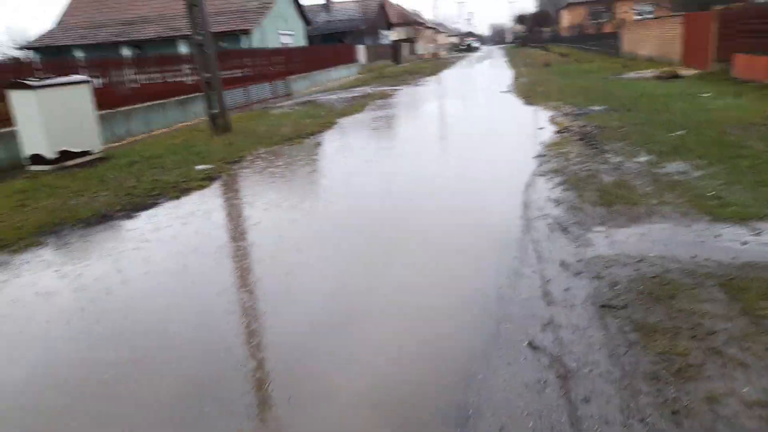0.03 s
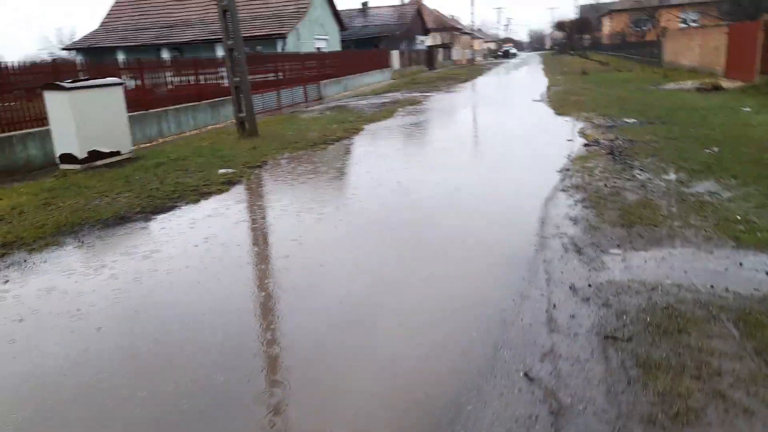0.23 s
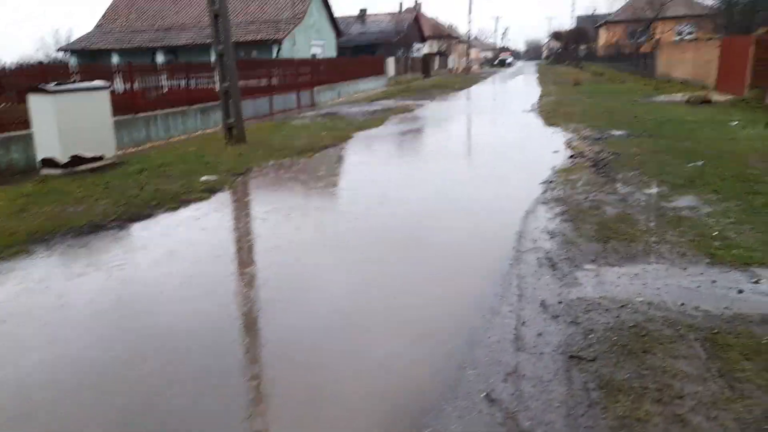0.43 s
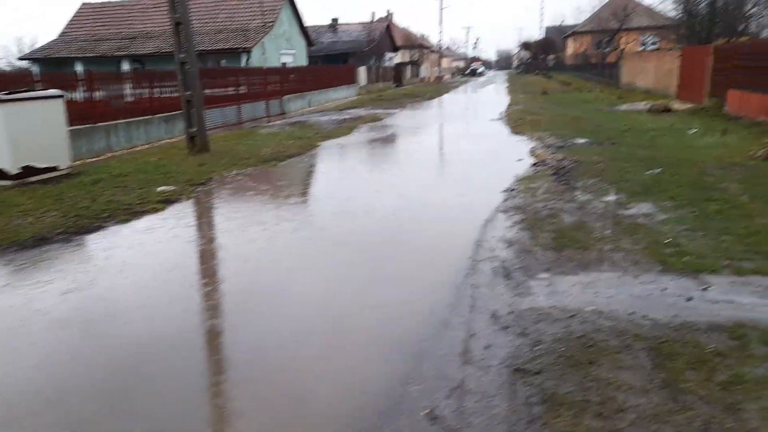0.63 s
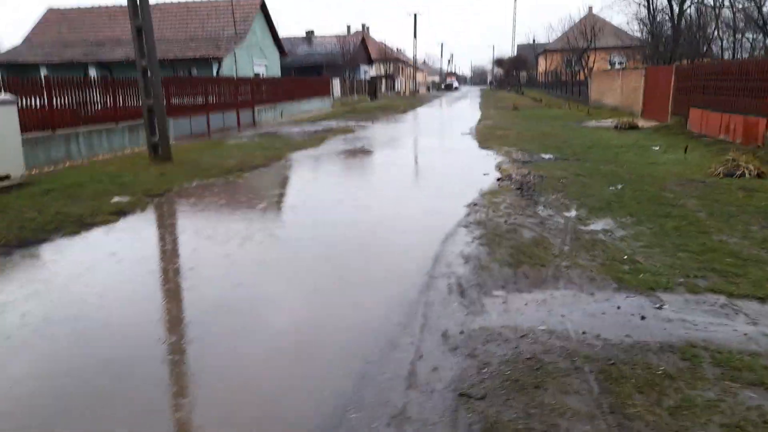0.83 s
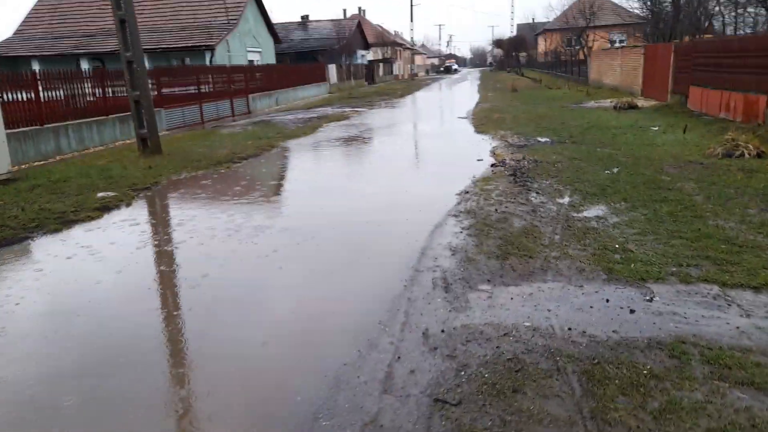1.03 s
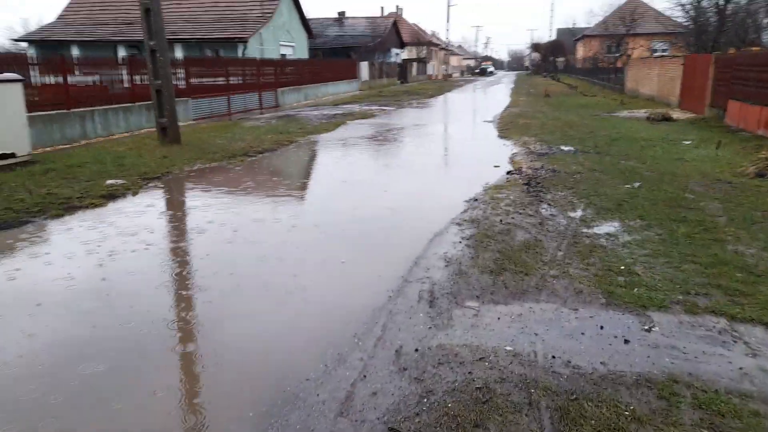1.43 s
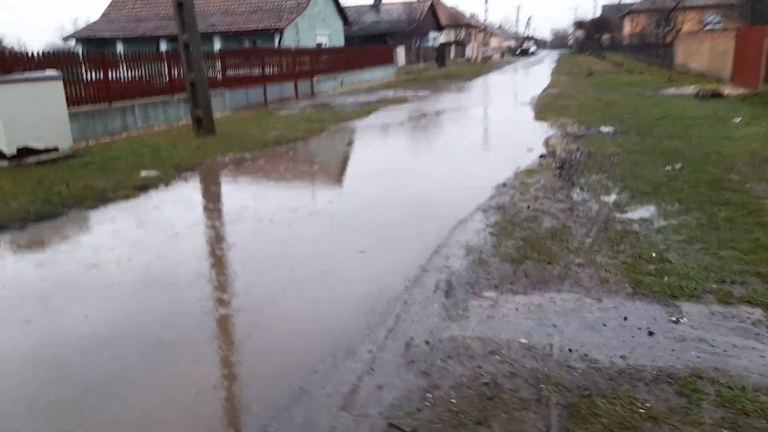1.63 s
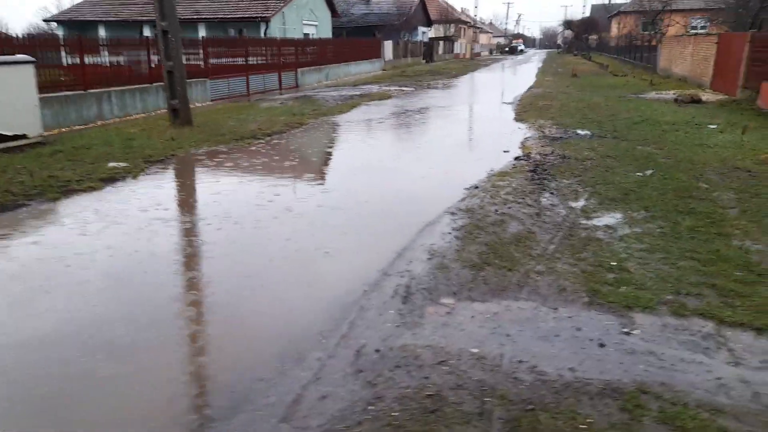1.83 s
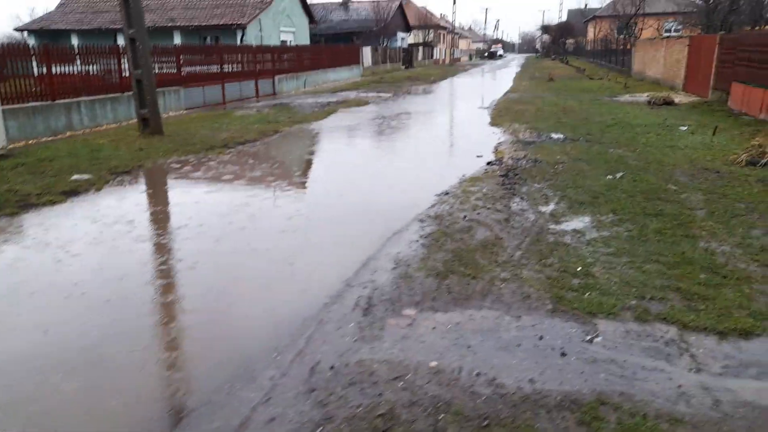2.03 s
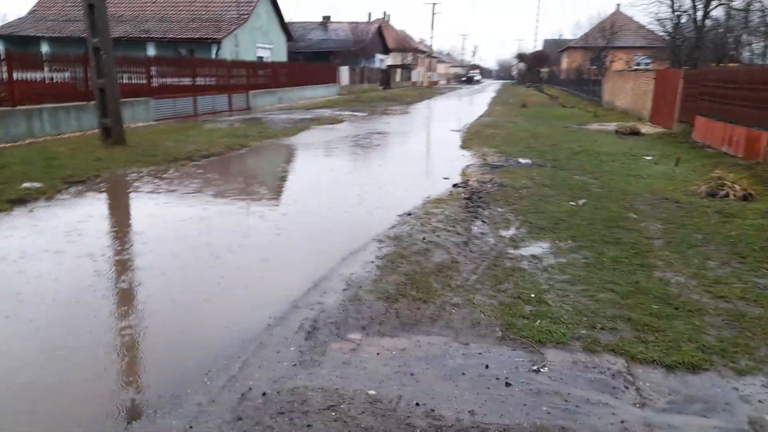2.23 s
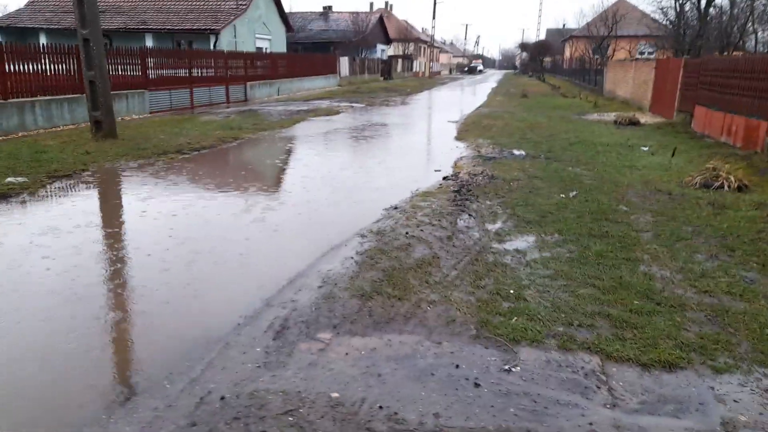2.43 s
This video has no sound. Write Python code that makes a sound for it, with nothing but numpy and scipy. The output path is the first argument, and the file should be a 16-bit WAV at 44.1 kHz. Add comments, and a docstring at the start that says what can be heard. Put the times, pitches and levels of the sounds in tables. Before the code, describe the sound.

Someone walks slowly through wet mud outdoors, each step a small fizzing smack, some with a squelch. Wind rumbles and thumps on the left of the close microphone early on, then drops away, while occasional drips tick over quiet hiss.

```python
"""Slow steps on wet mud

Someone walks beside a flooded village street, heard from the phone in their hand.
Each sole smacks the wet ground in a fizz of tiny bursts, and some squeeze out a ringing squelch.
Gusts buffet the left microphone for the first second; drops tick nearby over a soft background hiss."""
import sys
import numpy as np
from scipy import signal
from scipy.fft import rfft, irfft
from scipy.io import wavfile
from scipy.ndimage import uniform_filter1d

SR = 44100
rng = np.random.default_rng(int(sys.argv[2]) if len(sys.argv) > 2 else 0)


def store_pcm(level_fs):
    """Save levels as 16-bit WAV."""
    pcm = np.round(np.clip(level_fs, -1, 1) * 32767).astype(np.int16)
    wavfile.write(sys.argv[1], SR, np.atleast_2d(pcm).T)


N = 110250
T = np.arange(N) / SR

# tone of fizzing mud: f/Hz, level/dB
MUD_TONE = [(300, -9.5), (700, -3.5), (1300, -1), (2200, 4.5), (3300, 5), (4800, 2.5), (6800, -13.5),
            (8700, -15), (10500, -7), (14000, -1), (16000, -5.5)]
# extra colouring of the smacks, the same at both microphones: f/Hz, level/dB
SMACK_TONE = [(100, 16), (2500, -1.5), (5000, 5.5), (7500, 12.5), (10000, 3.5), (15000, -7)]
# wet smacks: t/s, level/dB, rise/s, fall/s, tilt/(dB per octave), left-right/dB, burst size spread/dB
SMACKS = [(0.003, -51.5, .004, 0.034, -5, -1.5, -6), (0.064, -42, 0.02, 0.025, 4, -9.5, -1),
          (0.575, -50, 0.0017, 0.0096, 5.5, -2, -7), (0.62, -38, 0.0081, .026, 4.5, -0.5, 0),
          (0.7, -48.5, 0.0055, 0.006, 0, 3.5, -1), (0.758, -43, 0.0022, 0.0051, 5.5, -11, -3),
          (0.772, -38, 0.0043, 0.0082, 3.5, 0.5, 6), (1.412, -56.5, .003, 0.025, 7, -2, 5),
          (1.446, -47.5, 0.0065, 0.022, 6, 1.5, 0.5), (1.484, -51, 0.0092, 0.018, -0.5, 4, 2),
          (1.519, -56, 0.024, 0.044, 3, -2.5, 7), (1.651, -64.5, 0.0048, 0.09, -1.5, -3.5, -5),
          (1.783, -61, 0.0072, 0.041, 5, -7, -1), (1.90, -57, 0.021, 0.025, 9, -2, 0),
          (2.134, -56.5, 0.0063, .03, 4.5, -1, 3), (2.213, -43.5, 0.026, 0.013, 3, -1, 1),
          (2.227, -40.5, .003, 0.0045, 5.5, -0.5, 2)]
SEEP_DB, SEEP_FALL_S = -12, 0.085
SHADOW_PER_OCTAVE = 0.63  # the phone's body adds this share of the left-right difference per octave


def smacks():
    """Films of water tear into tiny bursts under the sole, then the water seeps back."""
    out = 0
    for at, db, rise, fall, tilt_db, pan_db, spread_db in SMACKS:
        tearing = bursts(per_second=3000, spread_db=spread_db)[0]
        left, right = at_microphones(tearing, direct_share=0.46)
        shadow_db = SHADOW_PER_OCTAVE * pan_db / 2
        fizz = np.array([colour(left, MUD_TONE, tilt_db + shadow_db),
                         colour(right, MUD_TONE, tilt_db - shadow_db)])
        shape = swell(at, rise, fall) + gain(SEEP_DB) * swell(at, rise, SEEP_FALL_S)
        out += gain(db) * pan(pan_db) * shape * unit(fizz)
    return colour(out, SMACK_TONE)


# notes a mud pocket rings with at pitch ratio 1: f/Hz, width/Hz, level/dB
POCKET_NOTES = [(1375, 150, -3), (1840, 170, -15), (2080, 170, 1.5), (2400, 150, 0), (2610, 130, 4),
                (2717, 78, 10.5), (2870, 84, -18), (2900, 100, -8), (3260, 53, -11)]
# tone of the spurt itself: f/Hz, level/dB
SPLASH_TONE = [(150, -19), (450, -4), (1400, -8.5), (2800, 5.5), (3500, -7), (4500, -17), (14000, -46)]
# squelches under the sole: t/s, level/dB, fall/s, pitch ratio
SQUELCHES = [(0.606, -23.5, 0.0022, 1.01), (0.6119, -25.5, 0.003, 1.01), (1.352, -53.5, 0.0066, 0.62),
             (1.652, -57.5, 0.021, 1.32), (2.206, -36.5, 0.0015, 0.917), (2.2129, -38, 0.0043, .94),
             (2.225, -45, 0.014, 1.11)]


def squelches():
    """Air and water spurt from a pocket in the mud and make it ring."""
    out = 0
    for at, db, fall, pitch in SQUELCHES:
        shape = swell(at, rise=0.0013, fall=fall)
        rush = at_microphones(rng.standard_normal(N), direct_share=0.66)
        spurt = shape * steady(rush, seconds=0.006)
        ring = 0
        for hz, width, note_db in POCKET_NOTES:
            resonator = signal.iirpeak(hz * pitch, Q=hz / width, fs=SR)
            ring += gain(note_db) * signal.lfilter(*resonator, spurt + 1e-18)
        splash = gain(-7) * unit(colour(spurt, SPLASH_TONE))
        shape_level = np.sqrt(np.mean(shape ** 2))
        out += gain(db) * shape_level * (unit(ring) + splash)
    return out


# tone of a dragging sole: f/Hz, level/dB
SCUFF_TONE = [(100, -31), (250, 6), (400, 2.5), (700, -5), (1100, -19), (2000, -21.5), (5000, -23.5),
              (14000, -54)]
# dull scuffs: t/s, level/dB, rise/s, fall/s, left-right/dB
SCUFFS = [(1.362, -59, 0.0044, .012, 5), (1.455, -60.5, 0.011, 0.081, -4), (1.715, -55.5, 0.011, 0.0094, 6),
          (1.765, -62.5, .01, 0.046, 7), (1.843, -58, 0.0058, 0.009, 5), (2.021, -52.5, .002, 0.088, 3),
          (2.091, -57.5, 0.018, 0.011, 16), (2.121, -50, 0.011, 0.021, 8.5), (2.34, -60, 0.045, 0.15, -2)]


def scuffs():
    """A sole drags dully through soft mud."""
    out = 0
    for at, db, rise, fall, pan_db in SCUFFS:
        rubbing = colour(bursts(per_second=900, spread_db=2.5), SCUFF_TONE)
        out += gain(db) * pan(pan_db) * swell(at, rise, fall) * steady(rubbing, seconds=0.015)
    return out


# tones of a strong gust and of light air: f/Hz, level/dB
GUST_TONE = [(20, -35.5), (32, -0.5), (48, -6), (110, 3), (200, 0), (300, -4.5), (430, -21), (700, -34.5),
             (1200, -56.5), (3000, -88), (12000, -110)]
BREEZE_TONE = [(20, -55), (32, -9), (52, 1.5), (110, 1.5), (180, -1), (280, -18.5), (430, -35),
               (800, -43.5), (3000, -68), (12000, -105)]
# wind strength at each microphone: t/s, level/dB
LEFT_WIND = [(0, -43.5), (0.13, -47), (0.19, -45.5), (0.203, -24.5), (0.247, -17), (0.27, -21.5),
             (0.293, -19), (0.349, -14), (0.396, -22.5), (0.418, -31.5), (0.497, -25.5), (0.552, -29.5),
             (0.585, -19), (0.65, -14), (0.722, -37), (0.74, -21.5), (0.763, -22.5), (0.786, -20.5),
             (0.827, -35.5), (0.879, -27.5), (0.927, -18), (0.97, -16.5), (1.037, -21.5), (1.061, -72),
             (1.96, -96), (2.032, -36.5), (2.07, -74), (2.5, -74)]
RIGHT_WIND = [(0, -46), (0.07, -30), (0.15, -46.5), (0.53, -54), (0.6, -44), (0.74, -54), (0.83, -46),
              (1.02, -52), (1.09, -57.5), (1.16, -48.5), (1.21, -56), (1.28, -53), (1.6, -56), (1.68, -49),
              (1.76, -54), (1.97, -58.5), (2.06, -46), (2.094, -36.5), (2.125, -48), (2.21, -43),
              (2.28, -55), (2.32, -48), (2.37, -53), (2.5, -56)]
GUST_FROM_DB, GUST_SPAN_DB, CHURN_DB, RIGHT_BOOST_DB = -27.5, 14.5, -10.5, 1.5


def wind():
    """Swirls of air buffet each microphone; stronger gusts break into smaller, brighter swirls."""
    out = []
    for rows, boost_db in ((LEFT_WIND, 0), (RIGHT_WIND, RIGHT_BOOST_DB)):
        strength_db = curve(rows)
        swirls = bursts(per_second=160, spread_db=3.5)[0] + gain(CHURN_DB) * rng.standard_normal(N)
        gust_share = np.clip((strength_db - GUST_FROM_DB) / GUST_SPAN_DB, 0, 1)
        gust = gust_share * unit(colour(swirls, GUST_TONE))
        breeze = (1 - gust_share) * unit(colour(swirls, BREEZE_TONE))
        out.append(gain(strength_db + boost_db) * steady(gust + breeze, seconds=0.029))
    return np.array(out)


# tone of one wind thump: f/Hz, level/dB
THUMP_TONE = [(25, -13), (50, -8), (110, -1), (200, 0), (300, -2), (430, -17.5), (700, -26), (1200, -52.5),
              (3000, -63), (12000, -110)]
# wind thumps: t/s, peak on the louder side/dB, left-right/dB
WIND_THUMPS = [(0.221, -14.5, 37), (0.246, -17, 31), (0.266, -20.5, 30), (0.313, -16.5, 33),
               (0.342, -7.5, 38), (0.351, -12, 41), (0.583, -12, 35), (0.642, -9.5, 42), (0.923, -10, 37),
               (0.939, -13.5, 35), (0.9655, -6.5, 40), (0.9847, -5, 41), (2.091, -32.5, -16)]


def wind_thumps():
    """The hardest swirls hit a microphone as single pushes of air."""
    pulse = colour(signal.unit_impulse(N), THUMP_TONE)
    pulse /= np.abs(pulse).max()
    return sum(gain(db - abs(pan_db) / 2) * pan(pan_db) * np.interp(T - at, T, pulse, left=0)
               for at, db, pan_db in WIND_THUMPS)


# tone of a drop landing: f/Hz, level/dB
DROP_TONE = [(300, -1.5), (900, 3), (2000, 0), (4500, -8), (7000, -10), (10000, -22), (16000, -34)]
# nearby drops: t/s, level before the boost/dB, left-right/dB
DROPS = [(0.194, -53, 6), (0.302, -50, 3), (0.376, -55, 1), (0.421, -41.5, 9), (0.882, -50, 20),
         (0.944, -42, 5), (0.9808, -33, 11.5), (1.0077, -49, 19), (1.275, -58, 10), (1.3315, -47.5, 2),
         (1.826, -57, 19), (2.339, -58, 2), (2.44, -57, 16)]
DROP_FALL_S, DROP_BOOST_DB = 0.00069, 10


def drops():
    """Single drops land with a dry tick."""
    ticks = 0
    for at, db, pan_db in DROPS:
        noise = steady(rng.standard_normal((2, N)), seconds=0.003)
        ticks += gain(db) * pan(pan_db) * swell(at, rise=0, fall=DROP_FALL_S) * noise
    return gain(DROP_BOOST_DB) * colour(ticks, DROP_TONE)


# brief low hums: t/s, half length/s, f/Hz, level/dB, left-right/dB
HUMS = [(1.472, 0.03, 165.4, -52, -5), (2.437, 0.033, 178, -52, -5)]


def hums():
    """A soft low tone swells and fades."""
    out = 0
    for at, half_length, hz, db, pan_db in HUMS:
        shape = np.exp(-((T - at) / half_length) ** 4)
        tone = np.sqrt(2) * np.sin(2 * np.pi * (hz * T + rng.random()))
        out += gain(db) * pan(pan_db) * shape * tone
    return out


# tone of the background hiss at each microphone, with a low band on the left; the top treble falls away
# sharply: f/Hz, level/dB
LEFT_HISS_TONE = [(60, -7), (200, -0.5), (350, 12.5), (600, -2.5), (1000, -3.5), (2000, -6), (4500, -5.5),
                  (7000, -11), (10000, -16), (14400, -10), (15200, -37)]
RIGHT_HISS_TONE = [(60, -15), (200, 0.5), (350, 2.5), (600, 1.5), (850, 0), (2000, -6.5), (4500, -11),
                   (7000, -13), (10000, -9.5), (14400, -14), (15200, -28)]
# overall hiss, one list during the gusts and one after: t/s, level/dB
HISS_LEVELS = [
    [(0.0, -53), (0.134, -58), (0.406, -58), (0.79, -57.5), (0.856, -62.5), (0.978, -60), (1.03, -62.5)],
    [(1.07, -68.5), (1.276, -64.5), (1.532, -65.5), (1.854, -69.5), (2.088, -68), (2.244, -63),
     (2.5, -65.5)],
]
LEFT_HISS_DB, RIGHT_HISS_DB, PATTER_DB = 3, 2, -9  # added to the overall level


def background_hiss():
    """A soft, wide hiss with a fine patter in it."""
    left = gain(LEFT_HISS_DB) * unit(colour(rng.standard_normal(N), LEFT_HISS_TONE))
    right = gain(RIGHT_HISS_DB) * unit(colour(rng.standard_normal(N), RIGHT_HISS_TONE))
    ticks = colour(bursts(per_second=64, spread_db=3), DROP_TONE)
    patter = gain(PATTER_DB) * pan(1.1) * unit(ticks)
    return gain(curve(np.vstack(HISS_LEVELS))) * (np.array([left, right]) + patter)


def at_microphones(sound, direct_share, lag_s=0.00011):
    """A sound reaches the right microphone a little late; noise stands in for its scattered part."""
    direct = np.array([sound, np.roll(sound, round(lag_s * SR))])
    scattered = rng.standard_normal((2, N))
    return np.sqrt(direct_share) * direct + np.sqrt(1 - direct_share) * scattered


def bursts(per_second, spread_db):
    """Random clicks of very unequal size, in two channels."""
    clicks = (rng.random((2, N)) < per_second / SR) * rng.standard_normal((2, N))
    size_db = spread_db * np.minimum(rng.exponential(size=(2, N)), 4)
    return unit(clicks * gain(size_db))


def colour(x, tone, tilt_db=0):
    """Filter a sound by a tone table, tilted by tilt_db per octave around 5 kHz."""
    hz, db = np.array(tone).T
    octave = np.log2(np.maximum(np.fft.rfftfreq(N, 1 / SR), 10))
    tilt = tilt_db * np.maximum(octave - np.log2(5000), -2)
    response = gain(np.interp(octave, np.log2(hz), db) + tilt)
    # fold the cepstrum so the filter rings only after a click, never before it
    cepstrum = irfft(np.log(response), N)
    cepstrum[1:N // 2] *= 2
    cepstrum[N // 2 + 1:] = 0
    return irfft(rfft(x) * np.exp(rfft(cepstrum)), N)


def swell(at, rise, fall):
    """Grow to a peak, then die away, both exponentially."""
    return np.exp(-np.maximum((at - T) / max(rise, 1e-4), (T - at) / max(fall, 1e-4)))


def steady(x, seconds):
    """Hold the short-term level near 1."""
    window = max(int(seconds * SR), 2)
    power = uniform_filter1d(uniform_filter1d(x ** 2, window), window)
    return x / np.sqrt(np.abs(power) + 1e-12)


def gain(db):
    """Turn decibels into a multiplier."""
    return 10 ** (np.asarray(db) / 20)


def pan(db):
    """Left and right multipliers; positive db leans left."""
    return gain(np.array([[db], [-db]]) / 2)


def unit(x):
    """Scale to an average (rms) level of 1."""
    return x / np.sqrt(np.mean(x ** 2) + 1e-20)


def curve(rows):
    """Join (time, value) rows with straight lines."""
    return np.interp(T, *np.array(rows).T)


def scene():
    """Steps, drops, wind, hums and hiss sound together."""
    steps = smacks() + squelches() + scuffs()
    return steps + drops() + wind() + wind_thumps() + hums() + background_hiss()


def record(dry):
    """The phone cuts the deepest bass and the highest treble."""
    bass_cut = signal.butter(4, 36, "high", fs=SR, output="sos")
    treble_cut = signal.ellip(10, .2, 80, 15650, fs=SR, output="sos")
    return signal.sosfilt(treble_cut, signal.sosfilt(bass_cut, dry))


dry = scene()
out = record(dry)
store_pcm(out)
```